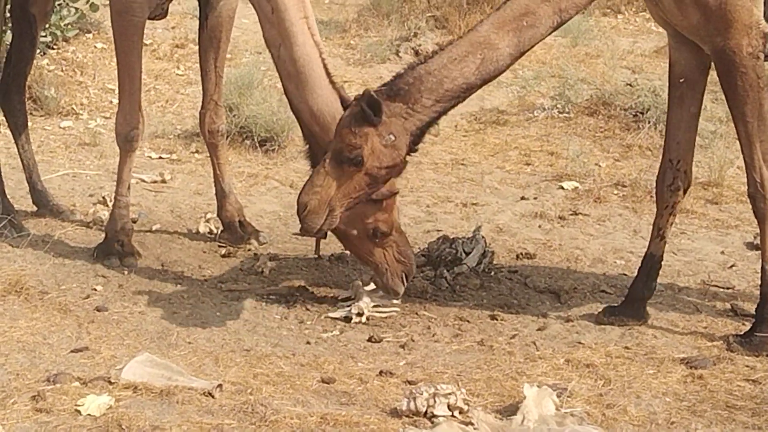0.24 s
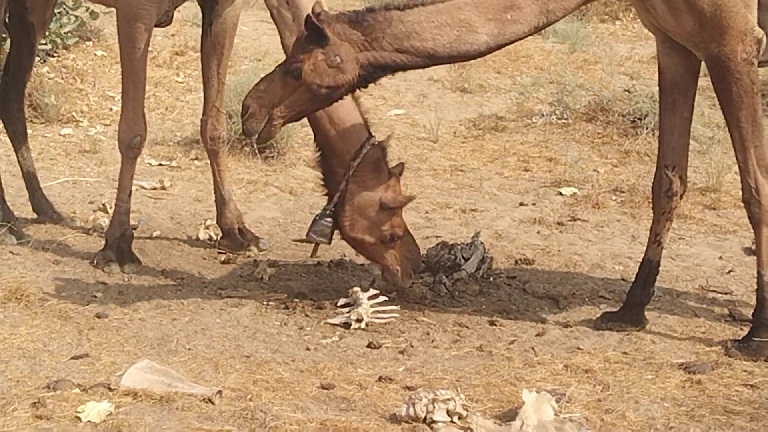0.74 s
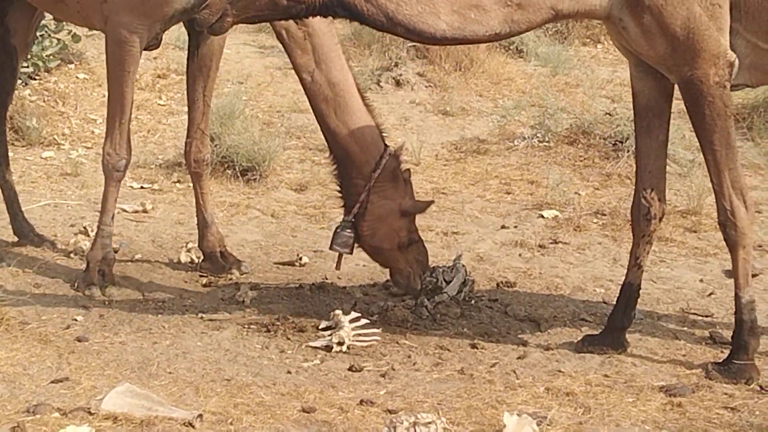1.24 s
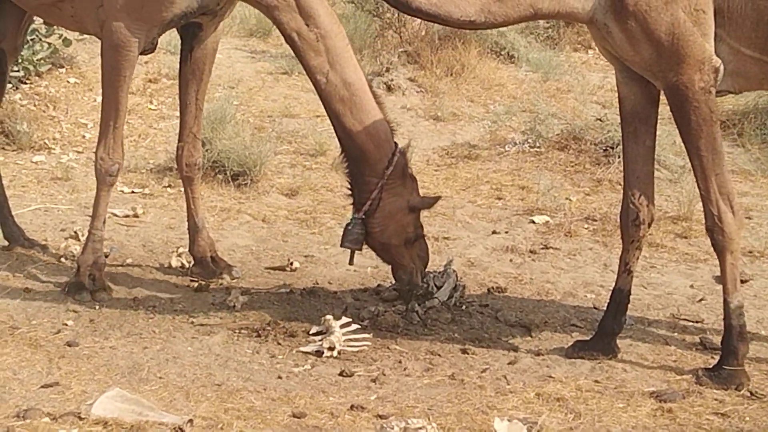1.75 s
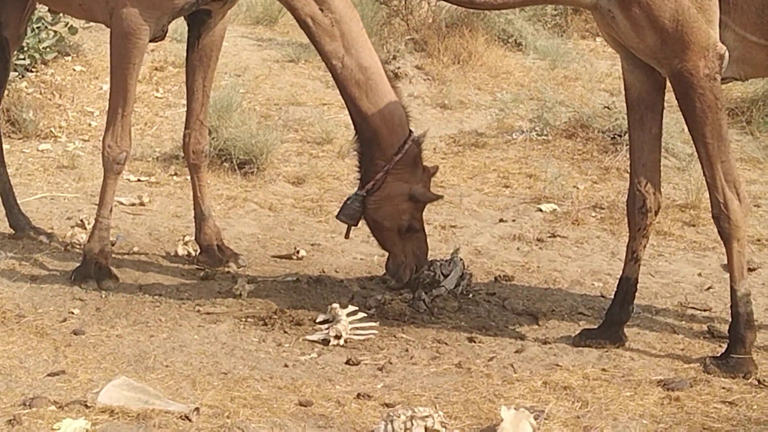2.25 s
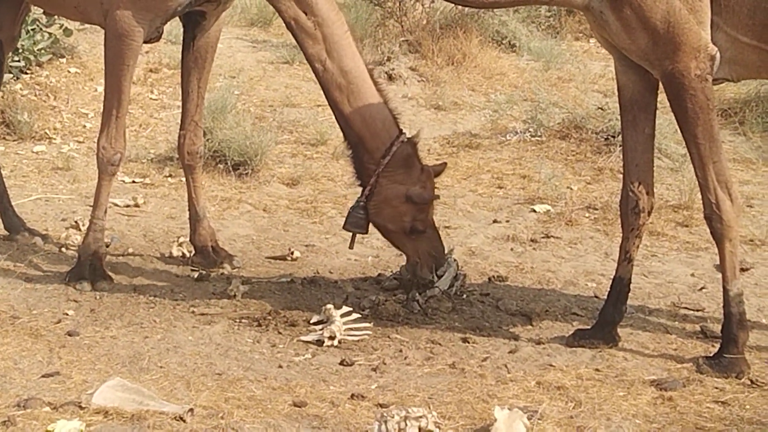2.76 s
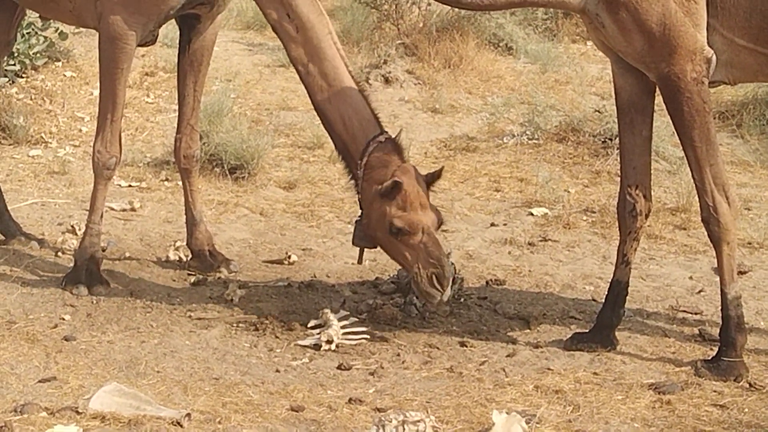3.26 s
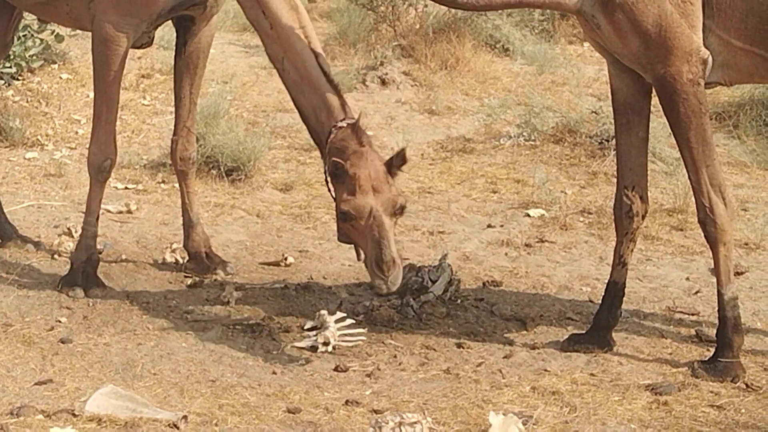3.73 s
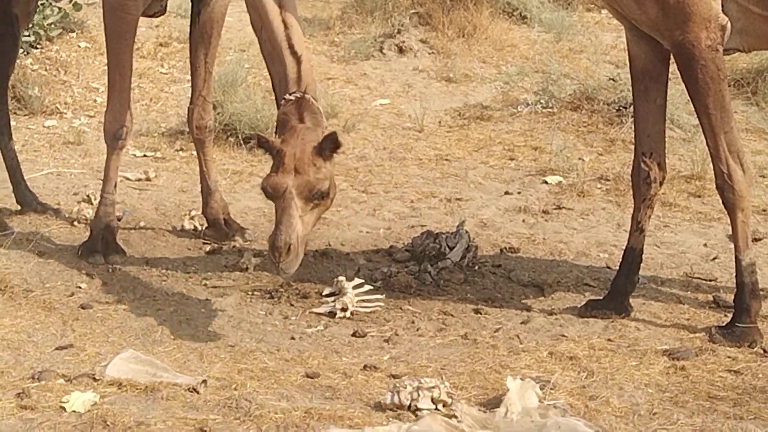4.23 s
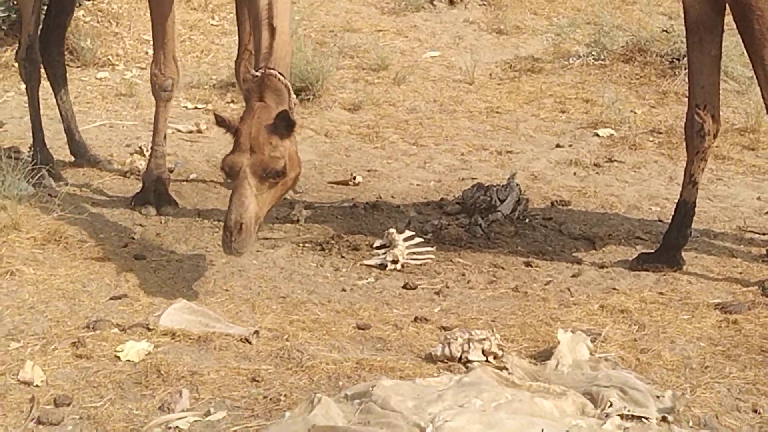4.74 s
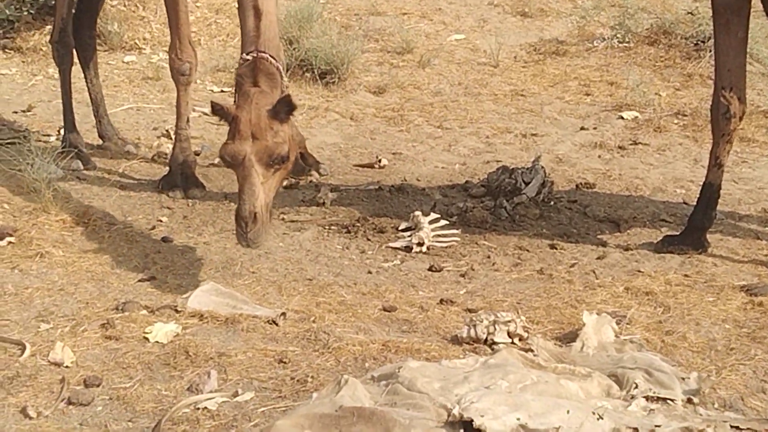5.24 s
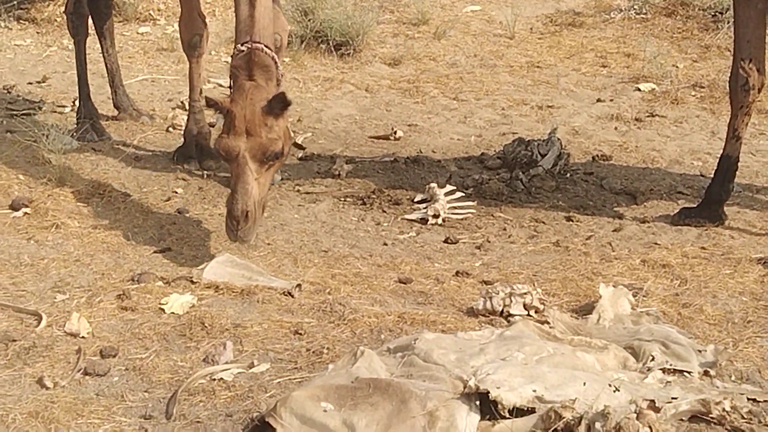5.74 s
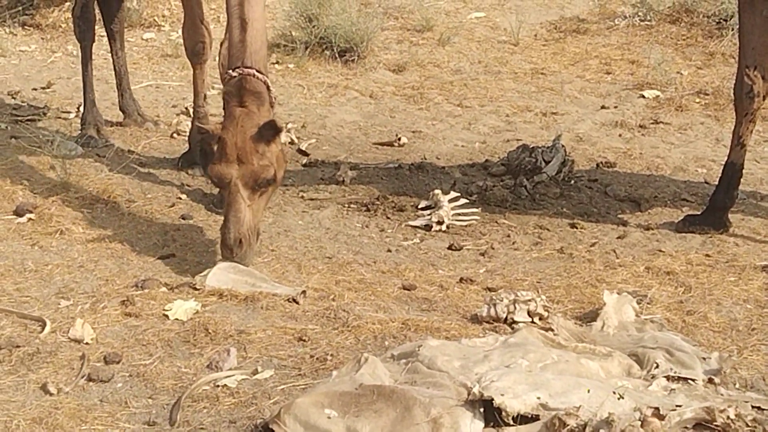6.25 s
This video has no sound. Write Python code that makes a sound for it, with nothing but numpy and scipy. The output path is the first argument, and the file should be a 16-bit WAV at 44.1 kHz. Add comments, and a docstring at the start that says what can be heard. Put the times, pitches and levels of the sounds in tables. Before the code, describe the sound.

A metal bell on a camel's neck clanks in quick, uneven runs while dry bones crack sharply as the animals chew outdoors.

```python
"""Camel bell and cracking bones

A sheet-metal bell on a camel's neck clanks in quick runs: each clapper touch stops the old ring and
starts a new one, a hollow cavity note under buzzing wall modes. The animals crack dry bones, each snap
a knock and a crumble. Outdoors on bare ground, both echo briefly over faint rumble and hiss."""
import sys
import numpy as np
from scipy import signal
from scipy.fft import rfft, irfft
from scipy.io import wavfile

SR = 44100
rng = np.random.default_rng(int(sys.argv[2]) if len(sys.argv) > 2 else 0)


def wav_out(sig):
    """Save sig, one row per channel (or a flat mono array), as 16-bit PCM at SR to the path in sys.argv[1]."""
    wavfile.write(sys.argv[1], SR, np.round(np.clip(np.atleast_2d(sig).T, -1, 1) * 32767).astype(np.int16))


N = 286209

CONTACT_S, REBOUND_S = 0.0098, 0.1
# Clapper touches, plus points (3.42, 4.8, 6.3 s) where the fading hum changes level and decay rate:
# t/s; level/dB of cavity note, hum, 1.5 kHz mode, side pair, 3 kHz mode, 4 kHz clusters, top clusters;
# lean of the pairs to their upper member/dB; damping/factor on decay rates
BELL_CUES = [(0, -14.5, -37.5, -67, -59, -83.5, -66.5, -49.5, -14, 2.54),
             (0.032, -24, -58, -49, -64, -58, -62.5, -57.5, -3, 1.3),
             (0.056, -21, -35, -48.5, -56, -70, -63.5, -55.5, -12, 0.99),
             (0.155, -37.5, -42, -58.5, -77.5, -85, -76.5, -73.5, -3, 0.66),
             (0.538, -46, -35, -54, -71, -54, -75.5, -63.5, 18, 0.75),
             (0.792, -24, -39, -62, -88.5, -62.5, -78, -63, -9, 1.22),
             (0.977, -13, -32, -58.5, -78, -69.5, -73, -46, 4, 1.55),
             (1.076, -59, -40.5, -65.5, -90.5, -100, -87, -71.5, -4, 1.07),
             (1.173, -15, -53, -52, -44.5, -58.5, -60, -54, -0.5, 1.09),
             (1.259, -28.5, -38.5, -64.5, -53, -74, -69, -71, -5, 0.88),
             (1.525, -24, -50.5, -65, -71, -100, -74.5, -58, 17, 0.9),
             (1.716, -63, -46, -58, -72, -95, -90.5, -71, 21, .8),
             (1.737, -30, -42, -44, -55.5, -73, -64.5, -63.5, -7, 1.01),
             (1.801, -40, -42.5, -48.5, -54.5, -61.5, -71, -65, -.6, 0.83),
             (1.86, -38.5, -50.5, -49.5, -61, -72.5, -83, -81, 0, 0.76),
             (2.142, -23, -50, -71, -79, -78.5, -76.5, -60.5, 9.5, 1),
             (2.193, -19, -71, -58, -61, -62.5, -71.5, -55, -6, 1.15),
             (2.238, -46.5, -49.5, -63.5, -69, -76.5, -78, -78, -4, 0.72),
             (2.414, -19, -37, -53.5, -79, -66.5, -60, -51, -11.5, 0.88),
             (2.624, -10.5, -49, -48, -69, -56, -59, -45, 12, 1.08),
             (2.686, -23.5, -42.5, -60.5, -76, -67, -70, -67, 9.5, 0.84),
             (3.042, -29, -35, -54.5, -67, -69.5, -57.5, -53, 3.5, 1.23),
             (3.115, -74, -38, -57, -71, -92, -73, -69, .4, 1.5),
             (3.174, -43.5, -42.5, -56, -62, -67.5, -75, -69.5, -3.5, 0.75),
             (3.42, -85, -57, -79.5, -90, -100, -105, -100, 1, 2.46),
             (3.874, -51, -57, -96, -100, -104, -110, -97, 0.3, 0.79),
             (4.177, -25, -52.5, -92, -91.5, -81.5, -76, -70.5, -1.5, 0.95),
             (4.384, -31.5, -49.5, -93.5, -83, -84.5, -84, -79, -7, 0.91),
             (4.669, -28, -53, -66, -101, -100, -83, -67, -7, 1.09),
             (4.8, -90, -69, -105, -95, -94, -88, -92, .4, 1.6),
             (5.155, -25.5, -35, -91.5, -72, -73, -78, -55, -13, .85),
             (5.369, -21.5, -42, -42.5, -52.5, -52.5, -65.5, -53.5, .4, 1.07),
             (5.461, -34.5, -37.5, -50.5, -55, -66, -69.5, -57.5, -5, 0.98),
             (5.789, -25.5, -48.5, -75.5, -90.5, -90.5, -82.5, -64, 7, 0.78),
             (5.996, -32.5, -39, -56, -100, -63.5, -93, -73.5, -4.5, 0.92),
             (6.3, -88, -59.5, -98.5, -109, -110, -106, -105, .4, 0.43)]


def bell():
    """The clapper strikes and the neck damps; each cue sets every mode family afresh until the next."""
    out = np.zeros(N)
    mode_count = sum(len(cluster[-1]) for family in MODE_CLUSTERS for cluster in family)
    spots = rng.normal(0, 1, (len(BELL_CUES), mode_count))   # each spot favours other modes
    ends = [cue[0] for cue in BELL_CUES[1:]] + [N / SR]
    last_cue, last_strike = -1, 0
    for cue, end, new_spot in zip(BELL_CUES, ends, spots):
        start, cavity_db, *wall_db, upper_db, top_db, lean_db, damping = cue
        start = round(start * SR) / SR
        if cavity_db > wall_db[0] + 2.5:   # anything lighter leaves the wall swinging in step
            last_strike = start
        if start - last_cue >= REBOUND_S:   # a quick rebound lands on the same spot
            spot = new_spot
        last_cue = start
        t = np.arange(round((end - start + CONTACT_S) * SR)) / SR
        tilt_db = lean_db * np.array([-0.5, 0.5])
        clank = cavity_note(t, cavity_db, damping)
        clank += wall_ring(t, start - last_strike, wall_db, tilt_db, damping)
        sparkle = upper_ring(t[:round(0.4 * SR)], (upper_db + tilt_db, [top_db] * 2), spot, damping)
        clank[:len(sparkle)] += sparkle
        clank *= 1 - contact_rise(t - (end - start))   # fades out as the next cue comes in
        add(out, start, clank)
        thump = from_db(cavity_db - 44) * np.hanning(round(0.005 * SR))   # the whole bell is pushed
        add(out, start, thump)
    return out + contact_grit()


def contact_grit():
    """The clapper stirs the dense modes of the thin wall: a bright tick and a lower scrape."""
    ticks, scrapes, t = np.zeros(N), np.zeros(N), np.arange(3000) / SR
    for start, _, _, mid_mode_db, *_, top_db, _, _ in BELL_CUES:
        noise = rng.standard_normal(len(t))
        add(ticks, start, from_db(sharpened(top_db, 0.37) - 17) * noise * decay(t, t60=0.02))
        add(scrapes, start, from_db(mid_mode_db - 18) * noise * decay(t, t60=0.04))
    return band(ticks, 6000, 15300) + band(scrapes, 1500, 4200)


def cavity_note(t, db, damping, hz=610.2, sharp_hz=14, settle_s=0.013):
    """The bell's hollow note rises a little slower than the wall, starts sharp and settles."""
    cycles = hz * t - sharp_hz * settle_s * np.expm1(-t / settle_s)
    envelope = contact_rise(t / 1.1) * decay(t * damping, t60=0.21)
    return from_db(db) * envelope * np.sin(2 * np.pi * cycles)


# Wall modes by family (hum, 1.5 kHz mode, side pair, 3 kHz mode): f/Hz, t60 before damping/s
WALL_MODES = [
    [(661, 0.93)],
    [(1515, 0.5)],
    [(1811, 0.49), (3269, 0.24)],
    [(2964, .37)],
]


def wall_ring(t, since_strike_s, levels_db, tilt_db, damping, lag_rad=1.4):
    """The sheet metal's low modes, their phase running on from the last firm strike."""
    out, rise = np.zeros(len(t)), contact_rise(t)
    for family, db in zip(WALL_MODES, levels_db):
        for (hz, t60), tilt in zip(family, tilt_db if len(family) > 1 else [0]):
            phase = 2 * np.pi * hz * (t + since_strike_s) - lag_rad
            out += from_db(db + tilt) * rise * decay(t * damping, t60) * np.sin(phase)
    return out


# Upper wall modes, two 4 kHz clusters then two top clusters:
# t60 at the centre before damping/s, centre f/Hz, level against the family/dB, each mode's f/Hz
MODE_CLUSTERS = [
    [(.3, 4030, -1, [3990, 4078]), (.38, 4270, -1, [4219, 4320])],
    [(.13, 5950, -1, [4570, 4680, 4804, 5132, 5295, 5749, 5860, 6053, 6240, 6433]),
     (.09, 8200, -6, [7030, 7117, 7330, 8010, 8210, 8740, 9055, 10080, 10950, 12000, 13600, 14600])],
]


def upper_ring(t, levels_db, spot, damping, spot_spread_db=6):
    """The metallic edge: modes weaken away from their cluster's centre, and higher ones die sooner."""
    out, spot_db = np.zeros(len(t)), iter(spot_spread_db * spot)
    for family, family_db in zip(MODE_CLUSTERS, levels_db):
        for (t60, centre_hz, offset_db, modes_hz), hit_db in zip(family, family_db):
            for hz in modes_hz:
                ratio = hz / centre_hz
                db = sharpened(hit_db, 0.37 * max(np.log2(hz / 6000), 0))
                db += offset_db + next(spot_db) - 40 * np.log2(ratio) ** 2
                ring = decay(t * damping, t60 / ratio ** 1.5) * np.sin(2 * np.pi * hz * t)
                out += from_db(db) / np.sqrt(len(modes_hz)) * ring
    return out * attack(t, 0.001)   # the clapper stays on the wall for a moment


def roughen(ring, top):
    """The loose clapper buzzes on the wall, the top most; the low ring has a slight, fast level wobble."""
    wall = highpass(ring, 1200)
    wobbles = [band(rng.standard_normal(N), 13, 180, order=1) for _ in range(2)]
    clapper_buzz, low_wobble = (wobble / np.std(wobble) for wobble in wobbles)
    lows = from_db(0.16 * low_wobble) * (ring - wall)
    mids = from_db(0.49 * clapper_buzz) * (wall - top)
    return lows + mids + from_db(3.5 * clapper_buzz) * top


# Bone snaps: t/s, knock f/Hz, knock level/dB, jaw thud level/dB, crack level/dB
BONE_SNAPS = [(0.498, 474, -54.5, -89.5, -91), (1.117, 980, -51.5, -52, -55),
              (1.121, 1013, -41.5, -57.5, -70.5), (1.205, 1047, -34, -58.5, -48.5),
              (2.49, 1057, -38.5, -59.5, -77), (2.608, 1033, -39.5, -69, -71),
              (2.72, 1052, -35.5, -56.5, -47), (3.004, 1010, -55.5, -79, -67),
              (3.147, 983, -61.5, -91.5, -58.5), (3.457, 1334, -84, -100, -73.5),
              (3.65, 1744, -53.5, -98.5, -56.5), (4.031, 1110, -82, -84.5, -58.5),
              (4.2, 786, -38.5, -80.5, -78.5), (4.392, 1320, -42.5, -74.5, -48.5),
              (4.426, 1260, -57.5, -84, -82), (4.477, 990, -45, -100, -54.5), (4.543, 846, -88, -95, -62.5),
              (4.616, 1090, -64, -61.5, -70), (4.622, 1050, -54.5, -67, -78), (4.749, 896, -33, -54.5, -43),
              (4.752, 962, -32.5, -40.5, -63.5), (5.214, 1076, -41.5, -67.5, -51.5),
              (5.224, 1030, -57.5, -100, -61), (5.239, 987, -38, -85, -60), (5.283, 940, -42, -84, -65),
              (5.312, 1050, -53, -100, -62), (5.588, 1050, -48.5, -82, -51.5),
              (5.65, 983, -29, -47.5, -45.5), (5.661, 990, -44, -42.5, -49),
              (5.667, 1024, -29.5, -47.5, -41), (5.674, 950, -28, -48, -47.5),
              (5.685, 937, -41.5, -67, -65), (5.73, 1020, -43, -53.5, -60), (5.782, 997, -45, -55, -68),
              (6.191, 850, -79, -90, -71)]
# Bone and jaw resonances (thud, body, crack, treble, splinters): low f/Hz, high f/Hz, crumble time/s
BONE_BANDS = [(256.2, 520, 0.0085), (1340, 2150, .003), (2750, 3720, 0.0044), (4270, 7500, 0.0034),
              (7500, 21000, 0.0015)]


def bone_snaps():
    """A dry bone breaks: a hollow knock plus a few milliseconds of crumbling through broad resonances."""
    out, t = np.zeros(N), np.arange(3000) / SR
    starts, pitches, knock_db, thud_db, crack_db = np.transpose(BONE_SNAPS)
    knock_shape = attack(t, 0.0006) ** 3 * decay(t, t60=0.024)
    for start, hz, db in zip(starts, pitches, knock_db):
        add(out, start, from_db(db) * knock_shape * np.sin(2 * np.pi * hz * t))
    body_db = crack_db + 0.48 * (knock_db - crack_db) - 4.5
    treble_db = sharpened(crack_db, 0.4) - 13
    splinter_db = sharpened(crack_db, 0.7) - 23
    band_levels = thud_db, body_db, crack_db, treble_db, splinter_db
    for (low_hz, high_hz, crumble_s), levels in zip(BONE_BANDS, band_levels):
        crumbs = np.zeros(N)
        burst = attack(t[:1000], 0.001) * np.exp(-t[:1000] / crumble_s)
        for start, db in zip(starts, levels):
            add(crumbs, start, from_db(db) * rng.standard_normal(len(burst)) * burst)
        out += band(crumbs, low_hz, high_hz, order=3)
    return out


def scattered_echo(x):
    """Scatter from bodies, legs and scrub: a short noise tail whose treble dies first."""
    t = np.arange(round(0.45 * SR)) / SR
    low, high = rng.standard_normal((2, len(t)))
    tail = band(low, 200, 2000) * np.sqrt(0.1) * decay(t, t60=0.34)
    tail += band(high, 2600, 15000, order=1) * decay(t, t60=0.26)
    tail *= attack(t, 0.0019)
    return signal.fftconvolve(x, tail / np.sqrt(np.sum(tail ** 2)))[:N]


# Fader ride of the breathy hiss: t/s, level/dB
BREATHY_RIDE = [(0, -60.5), (.45, -86), (0.7, -70), (1.5, -79), (2.4, -78.5), (3, -95), (6.49, -99)]


def breathy_hiss():
    """A faint, narrow band of noise near 1.5 kHz that dips, returns and fades away."""
    return fader(BREATHY_RIDE) * band(rng.standard_normal(N), 1420, 1570, order=3)


# Swells of high hiss: t/s, level/dB
HISS_WISPS = [(1.73, -84), (2.12, -89), (2.7, -94.5), (3.1, -94)]


def high_hiss_wisps():
    """Faint swells of 13-15 kHz hiss, each rising fast and fading."""
    swells, t = np.zeros(N), np.arange(SR) / SR
    for start, db in HISS_WISPS:
        add(swells, start, from_db(db) * attack(t, 0.04) * decay(t, t60=0.7))
    return swells * band(rng.standard_normal(N), 13200, 15400, order=3)


# Tone colour of the outdoor bed: f/Hz, relative level/dB
AIR_SPECTRUM = [(25, -29), (55, -9.5), (120, 5), (200, -3), (300, -10.5), (450, -13), (900, -13.5),
                (1400, -10), (1900, -27.5), (3100, -27.5), (5000, -27), (16000, -35)]
# Fader ride of the bed below 2 kHz: t/s, boost/dB
RUMBLE_RIDE = [(0, 8), (0.358, 3.2), (2.5, 2.5), (3.3, 1.2), (6.49, .1)]


def outdoor_air():
    """A bed of coloured noise: the rumble starts raised and eases down under a steady hiss."""
    hz = np.maximum(np.arange(N // 2 + 1) * SR / N, 1)
    points_hz, points_db = np.transpose(AIR_SPECTRUM)
    colour = from_db(np.interp(np.log(hz), np.log(points_hz), points_db))
    spectrum = rfft(rng.standard_normal(N)) * colour
    rumble, hiss = irfft(spectrum * (hz < 2000), N), irfft(spectrum * (hz >= 2000), N)
    return from_db(-85) * (fader(RUMBLE_RIDE) * rumble + hiss) / np.std(rumble + hiss)


def from_db(db):
    """Decibels to gain."""
    return 10 ** (np.asarray(db) / 20)


def fader(ride):
    """Gain curve through (t/s, level/dB) points."""
    return from_db(np.interp(np.arange(N) / SR, *np.transpose(ride)))


def sharpened(db, slope, mean_hit_db=-54):
    """Harder hits are brighter: the treble gains an extra slope dB per dB above a mean hit."""
    return db + slope * (db - mean_hit_db)


def contact_rise(t):
    """Smooth rise from 0 to 1 over the clapper's contact time."""
    return np.sin(np.pi / 2 * np.clip(t / CONTACT_S, 0, 1)) ** 2


def attack(t, rise_s):
    """Exponential rise from 0 to 1."""
    return 1 - np.exp(-t / rise_s)


def decay(t, t60):
    """Fall of 60 dB in t60 seconds."""
    return np.exp(-np.log(1000) * t / t60)


def band(x, low_hz, high_hz, order=2):
    """Band-pass, scaled so that unit white noise keeps an rms near 1."""
    sos = signal.butter(order, [low_hz, high_hz], "band", fs=SR, output="sos")
    return signal.sosfilt(sos, x + 1e-18) * np.sqrt(SR / 2 / (high_hz - low_hz))


def highpass(x, hz):
    """Keep what lies above hz."""
    return signal.sosfilt(signal.butter(4, hz, "high", fs=SR, output="sos"), x)


def add(out, start, sound):
    """Mix a sound in at start seconds."""
    i = round(start * SR)
    out[i:i + len(sound)] += sound[:N - i]


def scene():
    """Bell and bones with their echo, over the quiet background, in mono."""
    ring, snaps = bell(), bone_snaps()
    top = highpass(ring, 4500)
    ring = roughen(ring, top)
    echo_send = snaps + from_db(-15) * ring + from_db(-4) * top
    near = ring + snaps + from_db(-10) * scattered_echo(echo_send)
    ground_notch = signal.iirnotch(2330, Q=4, fs=SR)   # the bounce off the ground cancels one band
    near = signal.lfilter(*ground_notch, near)
    return (near + breathy_hiss() + high_hiss_wisps() + outdoor_air())[None]


def record(dry):
    """A steep low-pass cuts the very top, 50 dB down from 16.2 kHz."""
    return signal.sosfilt(signal.cheby2(12, 50, 16200, fs=SR, output="sos"), dry)


dry = scene()
out = record(dry)
wav_out(out)
```